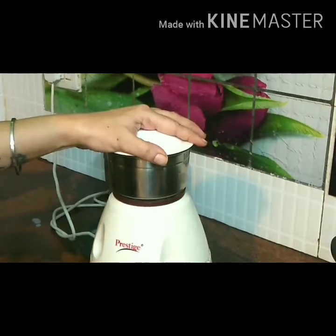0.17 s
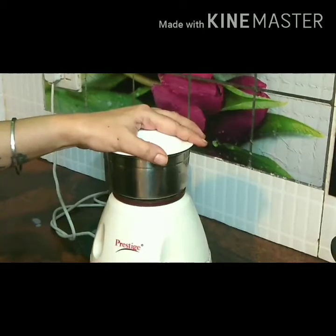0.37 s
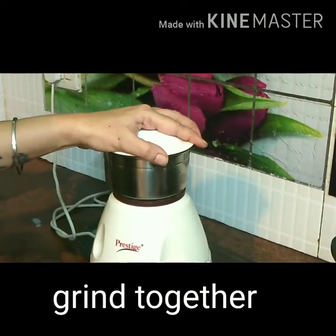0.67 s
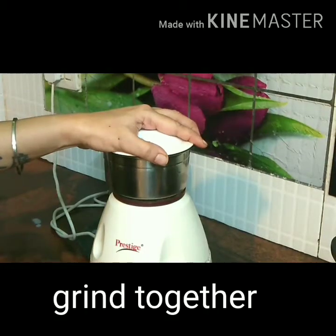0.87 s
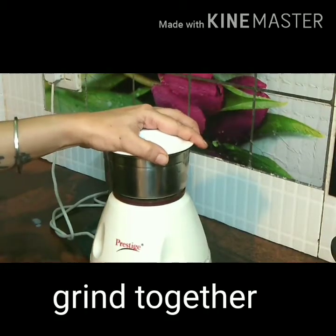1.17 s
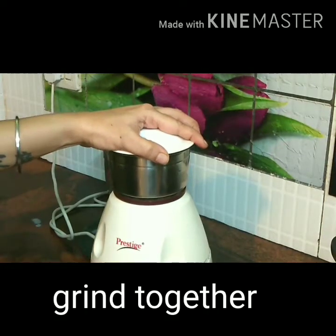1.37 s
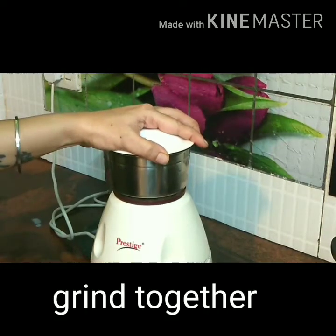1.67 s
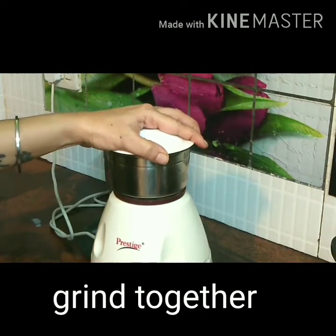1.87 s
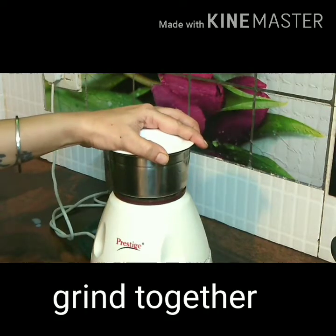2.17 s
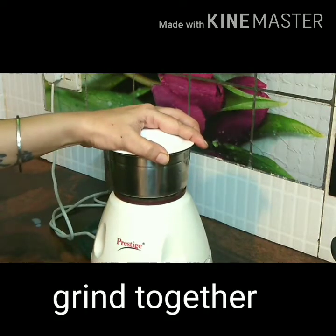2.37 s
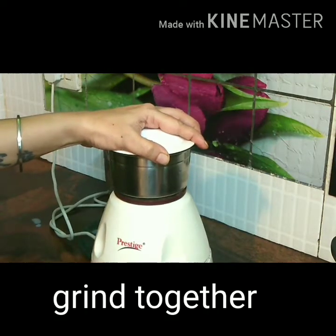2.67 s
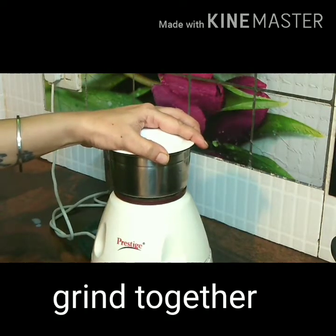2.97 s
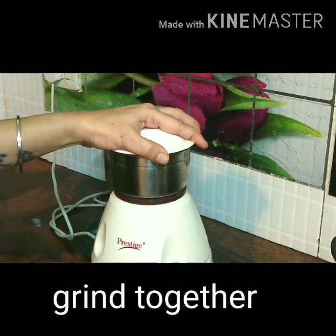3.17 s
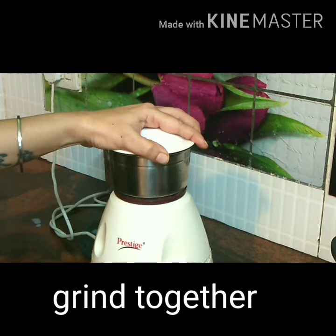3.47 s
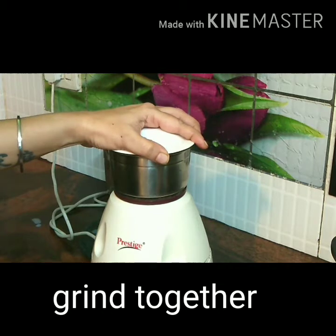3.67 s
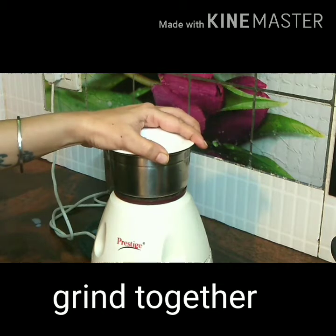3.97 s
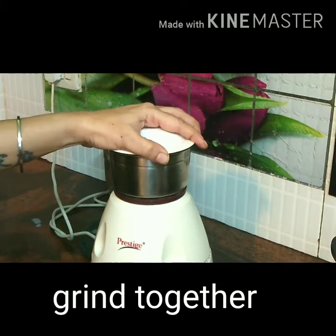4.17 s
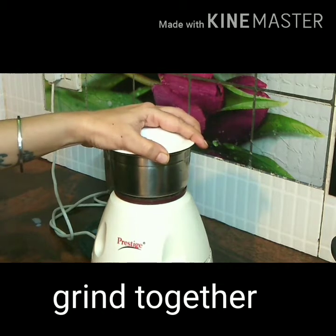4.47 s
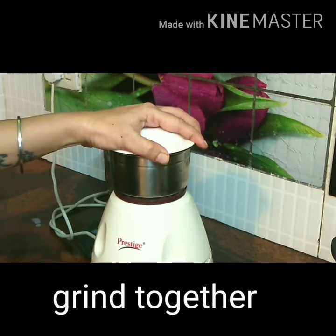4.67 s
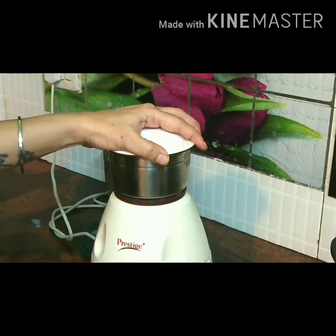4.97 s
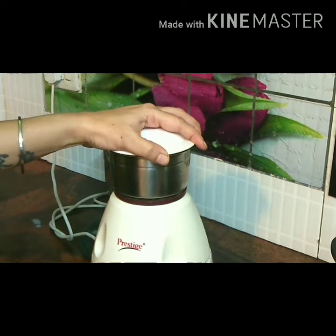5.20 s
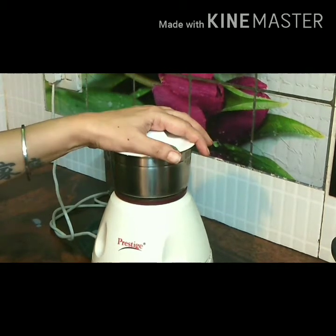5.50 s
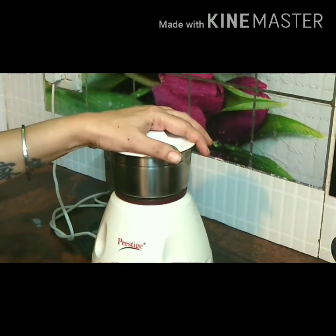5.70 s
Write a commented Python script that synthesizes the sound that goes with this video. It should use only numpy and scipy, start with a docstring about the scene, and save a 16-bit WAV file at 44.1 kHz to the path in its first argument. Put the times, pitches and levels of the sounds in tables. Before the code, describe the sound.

Four bursts of a mixer grinder, from short and rough to long and bright, with soft lid knocks in a quiet tiled kitchen.

```python
"""Room tone and soft lid knocks open the scene; then a kitchen mixer grinder is pulsed four times.
In each pulse the motor jolts on, spins up and coasts down; its whine is a set of shaft orders lit by frame resonances.
The blades mash wet leaves: random blows churn and rattle in the jar's resonances, and fan and brushes hiss.
After the first pulse come small sharp ticks; lid knocks, as noise bursts, recur between the pulses.
Later pulses run faster and shake less as the leaves turn to paste, and filtered noise with thin tones remains."""
import sys
import numpy as np
from scipy import signal
from scipy.fft import rfft, irfft, next_fast_len
from scipy.io import wavfile
from scipy.ndimage import uniform_filter1d, minimum_filter1d, map_coordinates

SR = 44100
rng = np.random.default_rng(int(sys.argv[2]) if len(sys.argv) > 2 else 0)


def generate_wav(sig):
    """Save sig (samples, or channels by samples) to the path in sys.argv[1] as 16-bit PCM at SR."""
    pcm = np.round(np.clip(np.atleast_2d(sig).T, -1, 1) * 32767).astype(np.int16)
    wavfile.write(sys.argv[1], SR, pcm)


N = 257499
TIME_S = np.arange(N) / SR


def amp(db):
    """Decibels to gain."""
    return 10 ** (np.asarray(db) / 20)


def unit(x):
    """x at rms 1."""
    return x / np.sqrt(np.mean(x ** 2) + 1e-20)


def along(points, hz):
    """(frequency, value) points interpolated on a log frequency axis."""
    f, v = np.transpose(points)
    return np.interp(np.log(hz + 1), np.log(f + 1), v)


def curves(rows):
    """One value per sample for each column after the time."""
    s, *cols = np.transpose(rows)
    return [np.interp(TIME_S, s, c) for c in cols]


def since(s):
    """Seconds from time s, one value per sample."""
    return TIME_S - s


def wobble(rate_hz):
    """Smooth random curve with rate_hz knots a second."""
    knots = rng.standard_normal(int(N * rate_hz / SR) + 4)
    return map_coordinates(knots, [np.arange(N) * rate_hz / SR])


def resonance_lift(rows, hz):
    """Summed lift in dB of (centre, width, lift) resonances at hz."""
    return sum(db / (1 + (2 * (hz - centre) / width) ** 2) for centre, width, db in rows)


def coloured(x, gain_db):
    """x through the minimum-phase filter whose gain is gain_db(Hz)."""
    size = 16384
    cepstrum = irfft(np.log(amp(gain_db(np.fft.rfftfreq(size, 1 / SR))) + 1e-6))
    # fold the cepstrum to make the filter causal
    cepstrum[1:size // 2] *= 2
    cepstrum[size // 2 + 1:] = 0
    impulse = irfft(np.exp(rfft(cepstrum)))[:size // 2]
    return signal.fftconvolve(x, impulse)[:N]


def impacts(rate_hz, spread_db):
    """Random blows, rate_hz a second on average, of widely differing sizes."""
    struck = rng.random(N) < rate_hz / SR
    sign = rng.choice([-1, 1], N)
    size = amp(spread_db * rng.standard_normal(N))
    return unit(struck * sign * size)


def burst(s, db, t60_s):
    """Noise from time s that falls 60 dB in t60_s."""
    age_s = since(s)
    return (age_s >= 0) * amp(db - 60 * np.abs(age_s) / t60_s) * rng.standard_normal(N)


SPIN_UP_S, SPIN_UP_SHAPE = 0.188, 0.75


def shaft_speed(on, off, top_hz, braking_hz_per_s):
    """Under power the shaft nears its top speed ever more slowly; switched off, the load brakes it evenly."""
    powered_s = np.clip(since(on), 0, off - on)
    reached_hz = top_hz * (1 - np.exp(-(powered_s / SPIN_UP_S) ** SPIN_UP_SHAPE))
    return np.maximum(reached_hz - braking_hz_per_s * np.maximum(since(off), 0), 0)


# switch presses: (on [s], off [s], top speed before drag [Hz], braking [Hz/s], starting jolt [dB],
# time until the blades bite [s], churn level [dB], rattle level [dB], hiss level [dB], shake level [dB])
SWITCH_PRESSES = [(1.027, 1.367, 130, 332, 2.5, .014, -15, -15, -23, -42.5),
                  (2.357, 2.637, 190, 353.8, 3.5, 0.09, -16.5, -9, -18, -50),
                  (3.138, 3.775, 210, 391, -2, 0.093, -18.5, -9.5, -18, -54),
                  (4.387, 5.575, 269.8, 200, 3, 0.062, -19, -11, -21.5, -59.5)]
# how much of the load the blades catch: (time [s], level [dB])
LOAD_CATCH = [(1.05, 0.5), (1.075, -4.5), (1.11, 3.5), (1.16, 1.5), (1.29, -6.5), (1.36, 2), (2.44, -.5),
              (2.7, 1), (3.3, -1), (3.79, -0.5), (3.84, -3), (4.46, -3), (4.535, 1), (4.58, -4.5),
              (4.63, 1.5), (4.7, -1.5), (4.87, 0.5), (4.92, -1.5), (5.33, -1.5), (5.36, -5), (5.84, -8.5)]
# grinding dies away as the unpowered blades slow: (shaft speed [Hz], churn [dB], rattle [dB], hiss [dB])
COAST_FADE = [(0, -47, -45.5, -58), (48.7, -24, -27.5, -34.5), (83.4, -8, -12.5, -13), (113, -0.5, -1, -4),
              (157, -0.5, -0.5, 0.5)]
DRAG_PER_DB = 0.002  # fraction of speed lost per dB of catch
INRUSH_DB, INRUSH_S = 3, 0.013  # the starting current kicks the motor, then fades


def drive(start_db=(-13, -22, -17), catch_share=(0.5, 1.0, 0.5), db_per_octave=(1, 0, 5),
          shake_share=0.91, bite_shape=1.73, surge_db=0.5, power_fade_s=0.054):
    """Speed, power and gains of churn, rattle, hiss, shake: a jolt, a swell to the bite, load, then coasting."""
    catch_db, = curves(LOAD_CATCH)
    coast_hz, *coast_db = np.transpose(COAST_FADE)
    load_db = catch_db + surge_db * wobble(25)
    speed_hz, power, gains = np.zeros(N), np.zeros(N), np.zeros((4, N))
    for on, off, top_hz, braking, jolt_db, bite_s, *levels_db, shake_db in SWITCH_PRESSES:
        hz = shaft_speed(on, off, top_hz, braking) * (1 - DRAG_PER_DB * catch_db)
        loose = 1 - np.clip(since(on) / bite_s, 0, 1) ** bite_shape
        unpowered = np.clip(since(off) / power_fade_s, 0, 1)
        turning = np.clip(since(on) / 0.001, 0, 1) * np.clip(hz / 5, 0, 1)
        octaves = np.log2(np.maximum(hz, 100) / 160)
        kick_db = INRUSH_DB * np.exp(-np.abs(since(on)) / INRUSH_S)
        shapes_db = []
        for start, share, per_octave, fade in zip(start_db, catch_share, db_per_octave, coast_db):
            onset_db = kick_db + (start + jolt_db) * loose
            running_db = share * load_db + per_octave * octaves
            coasting_db = unpowered * np.interp(hz, coast_hz, fade)
            shapes_db.append(onset_db + running_db + coasting_db)
        layers_db = [level + shape for level, shape in zip(levels_db, shapes_db)]
        layers_db.append(shake_db + shake_share * shapes_db[0])
        speed_hz = speed_hz + hz
        power = power + turning * (1 - unpowered)
        gains = gains + turning * amp(layers_db)
    return speed_hz, power, gains


# orders of the unbalanced blades:
# (multiple of shaft rate [1], relative level at reference speed [dB], change with power off [dB])
UNBALANCE_ORDERS = [(1, -35.5, 1.5), (2, -39.5, -5), (3, -37.5, -2.5), (4, -42.5, -8)]
# orders of armature slots, fan and commutator:
# (multiple of shaft rate [1], relative level at reference speed [dB], change with power off [dB])
MOTOR_ORDERS = [(12, -35, -3), (14, -40.5, 12), (24, -39, -1)]
# motor frame resonances: (centre [Hz], width [Hz], lift [dB])
FRAME_MODES = [(372.6, 30, 18), (472, 29, 13), (498.7, 14, 14), (531.6, 16, 12.5), (696.1, 32, 15),
               (775, 33, 11), (994, 90, 17), (2533, 160, 21), (4960, 450, 14), (5950, 400, 4)]
REFERENCE_HZ = 250


def whine(speed_hz, power, turns, flutter_db=3.0, wander_rad=0.045, blur_rad=0.09, whine_db=-1.5,
          hum_growth=3.43, whine_growth=2.2, strain_share=0.43):
    """Shaft orders grow with speed and sing in frame resonances; random wobble roughens and smears their pitch."""
    catch_db, = curves(LOAD_CATCH)
    wandering_turns = turns + wander_rad * wobble(45) / (2 * np.pi)

    def order(k, db, off_db, smear_rad):
        """Sine at k times the shaft rate, coloured by the frame."""
        gain = np.sqrt(2) * amp(db + off_db * (1 - power) + resonance_lift(FRAME_MODES, k * speed_hz))
        return gain * np.sin(2 * np.pi * (k * wandering_turns + rng.random()) + smear_rad)

    hum = np.zeros(N)
    for k, db, off_db in UNBALANCE_ORDERS:
        level_db = db + (0.88 + 0.74 * k) * wobble(30)
        hum += order(k, level_db, off_db, blur_rad * k * wobble(90))
    armature = np.zeros(N)
    for k, db, off_db in MOTOR_ORDERS:
        level_db = db + whine_db + flutter_db * wobble(30)
        roughness_rad = 1.1 * wobble(150) + 0.55 * wobble(600)
        armature += order(k, level_db, off_db, roughness_rad)
    pace = speed_hz / REFERENCE_HZ
    strain = amp(strain_share * catch_db)
    return pace ** hum_growth * hum + pace ** whine_growth * strain * armature


# jar and housing resonances: (centre [Hz], width [Hz], lift [dB])
JAR_MODES = [(376, 106, 9.5), (478, 65, 5), (579, 23, 2.5), (683, 36, 5), (899, 60, 6.5), (1140.5, 74, 9),
             (1266, 38, 5), (1488, 71, 4.5), (1580, 54, 4.5), (1643, 15, 2), (1774, 73, 3.5), (1880, 31, 1),
             (2184, 46, 3.5), (2330, 45, 1), (2507, 45, 6), (3580, 42, 3), (3910, 71, 6.5), (4490, 26, 2.5)]


def through_jar(x, spectrum):
    """x with a broad spectrum and the jar's resonances on top, at rms 1."""
    return unit(coloured(x, lambda hz: along(spectrum, hz) + resonance_lift(JAR_MODES, hz)))


def patchy(x, spread_db):
    """The rattle's colour shifts at random, band by band, in brief patches."""
    z = signal.stft(x, nperseg=512)[2]
    across_bands = uniform_filter1d(rng.standard_normal(z.shape), size=5, axis=0)
    patches = unit(uniform_filter1d(across_bands, size=7, axis=1))
    return unit(signal.istft(z * amp(spread_db * patches), nperseg=512)[1][:N])


# broad spectrum of whole leaves: (frequency [Hz], relative density [dB per Hz])
LEAF_SPECTRUM = [(25, -32), (80, -22), (180, -14), (260, -8.5), (350, -0.5), (450, 1), (600, 4.5), (900, 1),
                 (1300, -0.5), (2500, -18), (6000, -58.5)]
# broad spectrum of paste: (frequency [Hz], relative density [dB per Hz])
PASTE_SPECTRUM = [(25, -38), (80, -26.5), (160, -21.5), (260, -14.5), (350, -8), (450, -4.5), (600, -3.5),
                  (900, -0.5), (1300, -20), (2500, -27), (6000, -40)]
# broad spectrum of load on the wall: (frequency [Hz], relative density [dB per Hz])
RATTLE_SPECTRUM = [(200, -54), (600, -5), (1000, -2.5), (1600, 2.5), (2400, -1), (2800, -9), (3800, -12.5),
                   (5000, -20.5), (9000, -18.5), (16000, -41)]
# broad spectrum of fan and brushes: (frequency [Hz], relative density [dB per Hz])
HISS_SPECTRUM = [(300, -38.5), (1500, -4), (3300, 4), (4500, 0.5), (5500, -2.5), (7500, -4), (10000, 0.5),
                 (12000, -5), (15500, -11)]


def grinding(speed_hz, turns, churn, rattle, hiss, churn_db=-4, rattle_db=-2.0, hiss_db=-3,
             throb_db=1.0, lump_db=1.03, mains_db=1.0, thinning_db=-2):
    """Random blows churn and batter the wall, throbbing once a turn; fan and brushes hiss."""
    # the load is lopsided and tumbles in lumps
    load = amp(throb_db * np.cos(2 * np.pi * turns) + lump_db * wobble(110))
    # torque and sparking swell with each half wave of the mains
    mains = amp(mains_db * np.cos(2 * np.pi * 100 * TIME_S))
    # slow blades heave whole leaves about; fast ones stir a thinner, brighter paste
    free = np.clip((speed_hz - 110) / 120, 0, 1)
    leaves = through_jar(load * impacts(1500, spread_db=1.5), LEAF_SPECTRUM)
    paste = amp(thinning_db) * through_jar(load * impacts(3000, spread_db=3.5), PASTE_SPECTRUM)
    mash = np.sqrt(1 - free) * leaves + np.sqrt(free) * paste
    wall = through_jar(load * impacts(4000, spread_db=2.5), RATTLE_SPECTRUM)
    wall = patchy(wall, spread_db=1.42)
    grit = 0.94 * load * impacts(4000, spread_db=2.5)
    air = through_jar(mains * (rng.standard_normal(N) + grit), HISS_SPECTRUM)
    return amp(churn_db) * churn * mash + amp(rattle_db) * rattle * wall + amp(hiss_db) * hiss * air


def cracks(rows, t60_s, width_octaves):
    """Brief noise blows, each centred on its own pitch and scaled to its own peak."""
    total = np.zeros(N)
    for s, db, pitch_hz in rows:
        def band_db(hz):
            """Gain falling away on both sides of the pitch."""
            return -10 * np.log10(1 + (np.log2((hz + 1) / pitch_hz) / width_octaves) ** 6)

        crack = coloured(burst(s, 0, t60_s), band_db)
        total += amp(db) * crack / np.abs(crack).max()
    return total


# hard bits of stalk: (time [s], peak before the room [dB], pitch [Hz])
STALK_SNAPS = [(1.0858, -5, 8250), (1.1074, -12.5, 5670), (1.3523, -11, 9200), (1.3644, -14, 9350),
               (2.6504, -8.5, 6390), (4.7494, -7.5, 10700), (5.3594, -14, 9200), (5.6366, -7, 12470),
               (5.6994, -18, 5990)]


def snaps():
    """Stalk snaps on the blades in short bright cracks."""
    return cracks(STALK_SNAPS, t60_s=0.025, width_octaves=0.48)


# low soft thuds: (time [s], peak before the room [dB], pitch [Hz])
LOW_THUDS = [(1.043, -14, 623), (1.107, -8, 460), (1.15, -14.5, 400), (1.215, -23, 404), (2.5, -21, 393),
             (5.333, -30, 175)]


def thuds():
    """Low soft thuds: noise bursts lower and longer than the snaps."""
    return cracks(LOW_THUDS, t60_s=0.091, width_octaves=0.59)


# bare steel modes of the jar: (frequency [Hz], relative level [dB], t60 [s])
STEEL_MODES = [(372, -6.5, 0.32), (556, -4, 0.59), (868, 4.5, 0.51), (1490, -5, 0.34), (2180, -11.5, .25),
               (4100, -3.5, 0.39)]


def ringing(x, ring_db=-4):
    """The jar's narrow steel modes, driven by x, ring on and decay exponentially."""
    t = np.arange(SR) / SR
    modes = np.zeros(SR)
    for hz, db, t60_s in STEEL_MODES:
        resonant_norm = 2 * np.log(1000) / (t60_s * SR)  # unit gain at resonance
        modes += amp(db - 60 * t / t60_s) * np.sin(2 * np.pi * hz * t) * resonant_norm
    return amp(ring_db) * signal.fftconvolve(x, modes)[:N]


# counter rumble spectrum: (frequency [Hz], relative gain [dB])
SHAKE_SPECTRUM = [(25, -11.5), (50, -9), (72, 0), (100, -4.5), (170, -17.5), (400, -51.5)]


def shake():
    """The body rocks on its rubber feet and rumbles into the counter, as low-passed random blows."""
    return unit(coloured(impacts(280, spread_db=8.5), lambda hz: along(SHAKE_SPECTRUM, hz)))


# lid shifting under the hand: (time [s], relative level [dB])
LID_KNOCKS = [(0.3132, -43), (0.4868, -46), (0.7936, -45), (1.847, -42), (1.866, -38), (1.8724, -44),
              (3.0394, -44), (3.12, -40.5), (4.3038, -43.5)]
# lid colour: (frequency [Hz], gain [dB])
LID_SPECTRUM = [(400, 5), (1500, 11.5), (2900, 12.5), (4500, -5.0), (9000, -12)]


def lid(level_db=-10.5, t60_s=0.085):
    """Soft knocks of the lid on the jar: decaying noise strongest in the midrange."""
    knocks = sum(burst(s, db + level_db, t60_s) for s, db in LID_KNOCKS)
    return coloured(knocks, lambda hz: along(LID_SPECTRUM, hz))


# small sharp ticks at rest: (time [s], peak before the room [dB], pitch [Hz])
REST_TICKS = [(1.779, -24.5, 14500), (1.7792, -39, 5800), (1.819, -39.5, 10300), (1.9625, -42, 10500),
              (2.019, -52, 10300)]


def ticks():
    """Very short narrow-band noise bursts while the blades rest."""
    return cracks(REST_TICKS, t60_s=0.003, width_octaves=0.23)


def tiles(x, wet_db, t60_s):
    """The tiled corner adds a short dense echo of decaying noise."""
    t = np.arange(SR // 3) / SR
    tail = rng.standard_normal(len(t)) * amp(-60 * t / t60_s) * (t > 0.002)
    echo = signal.fftconvolve(x, tail / np.linalg.norm(tail))[:N]
    return (x + amp(wet_db) * echo) / np.sqrt(1 + amp(2 * wet_db))


# room noise spectrum: (frequency [Hz], relative density [dB per Hz])
ROOM_SPECTRUM = [(25, -37), (36, -29), (52, -4.5), (90, -3.5), (125, -24.5), (160, -28.5), (200, -4.5),
                 (250, -12.5), (320, -5), (550, -1), (1400, -11), (2400, -16), (3200, -24), (5500, -28.5),
                 (15000, -30.5)]
# thin appliance tones: (frequency [Hz], rms level at the start [dB])
ROOM_TONES = [(86, -78.5), (196, -70), (2363, -69.5), (2460, -75), (3101, -80.5)]
# room noise: (time [s], level [dB])
ROOM_NOISE_LEVEL = [(0, -54), (2.35, -53.5), (3.05, -56.5), (4.35, -57), (5.84, -65)]


def room_tone():
    """Kitchen background: coloured noise with a few thin, slightly phase-wandering appliance tones."""
    level_db, = curves(ROOM_NOISE_LEVEL)
    noise = unit(coloured(rng.standard_normal(N), lambda hz: along(ROOM_SPECTRUM, hz)))
    tones = np.zeros(N)
    for hz, db in ROOM_TONES:
        tones += np.sqrt(2) * amp(db) * np.sin(2 * np.pi * hz * TIME_S + 0.64 * wobble(8))
    return amp(level_db) * noise + amp(level_db - level_db[0]) * tones


def scene():
    """The mixer and its lid in the tiled corner, over room tone."""
    speed_hz, power, (churn, rattle, hiss, rocking) = drive()
    turns = np.cumsum(speed_hz) / SR
    mixer = grinding(speed_hz, turns, churn, rattle, hiss) + snaps() + thuds()
    small = lid() + ticks()
    corner = tiles(mixer + small, wet_db=-9, t60_s=0.13)
    motor = whine(speed_hz, power, turns)
    return (corner + ringing(mixer) + rocking * shake() + motor + room_tone())[None]


TOP_HZ = 15650


def record(dry, ceiling=0.83):
    """A fast limiter holds the highest peaks down; the treble ends steeply at the band limit."""
    needed = np.minimum(1, ceiling / (np.abs(dry) + 1e-9))
    gain = uniform_filter1d(minimum_filter1d(needed, size=65), size=65)
    m = next_fast_len(N + SR // 2)
    passed = np.clip((TOP_HZ - np.fft.rfftfreq(m, 1 / SR)) / 250 + 0.5, 0, 1)
    return irfft(rfft(dry * gain, m) * passed, m)[..., :N]


dry = scene()
out = record(dry)
generate_wav(out)
```